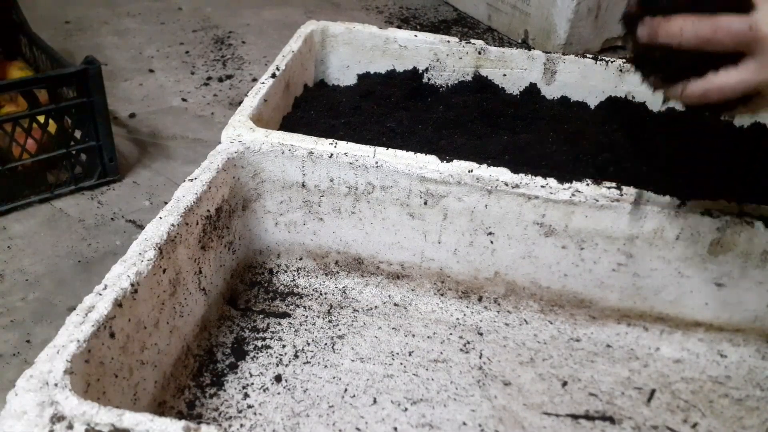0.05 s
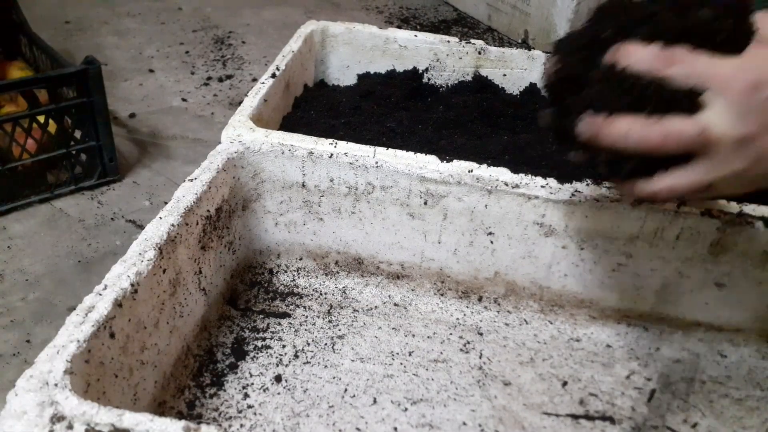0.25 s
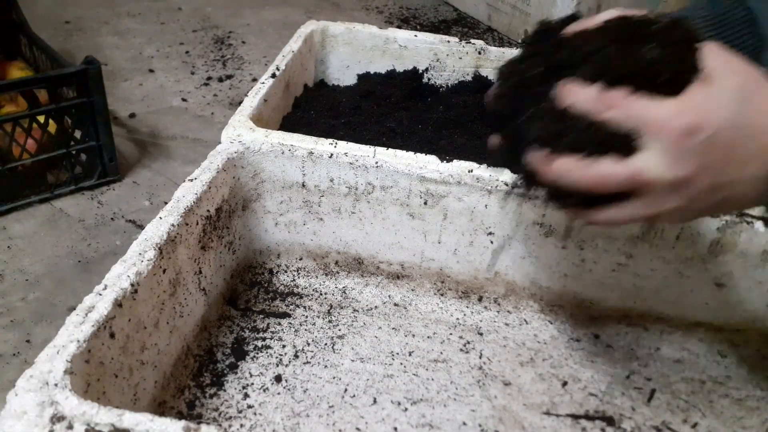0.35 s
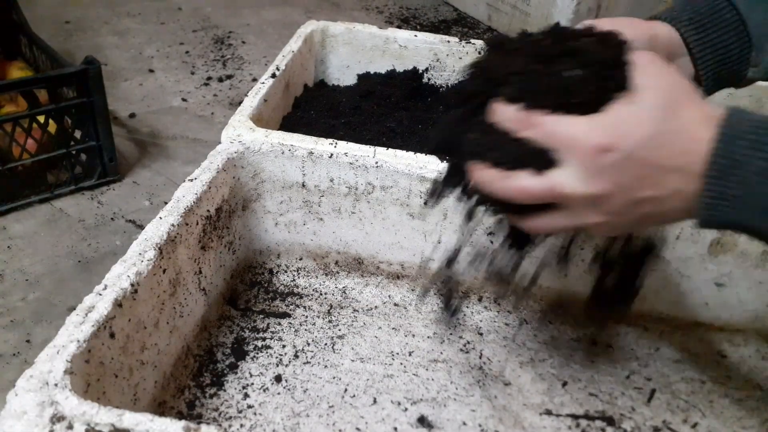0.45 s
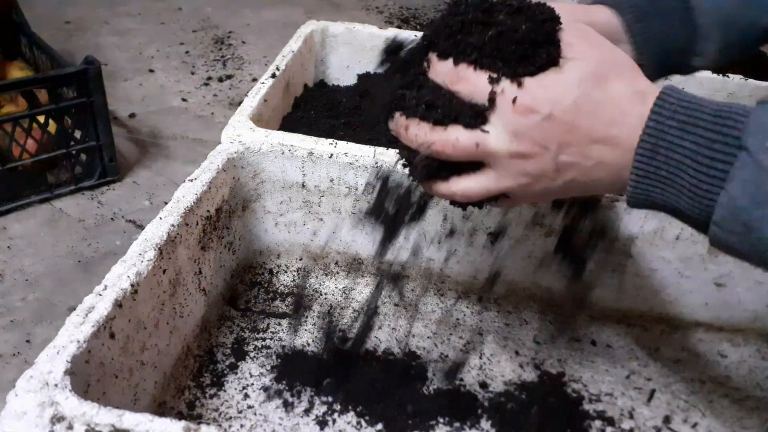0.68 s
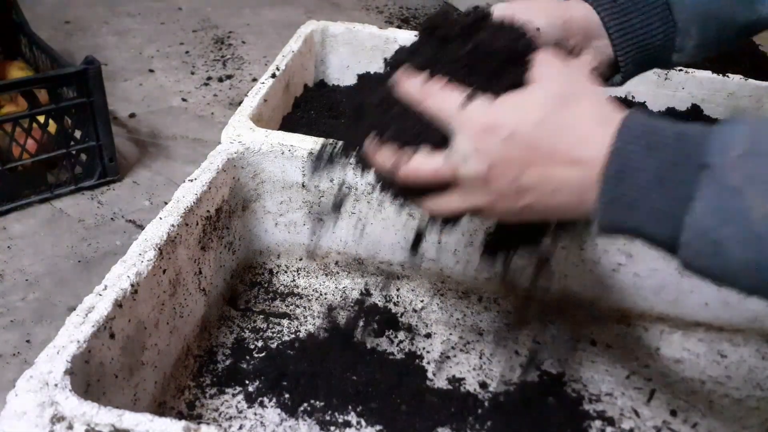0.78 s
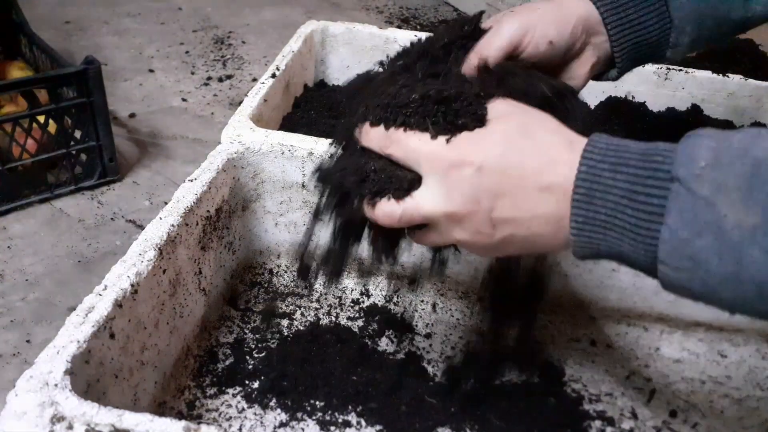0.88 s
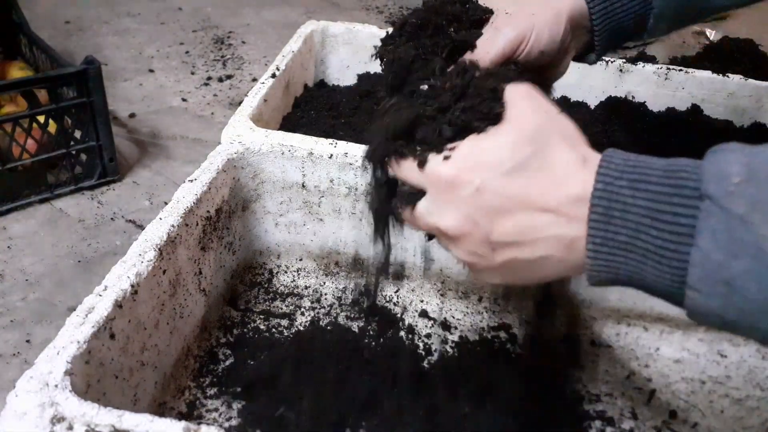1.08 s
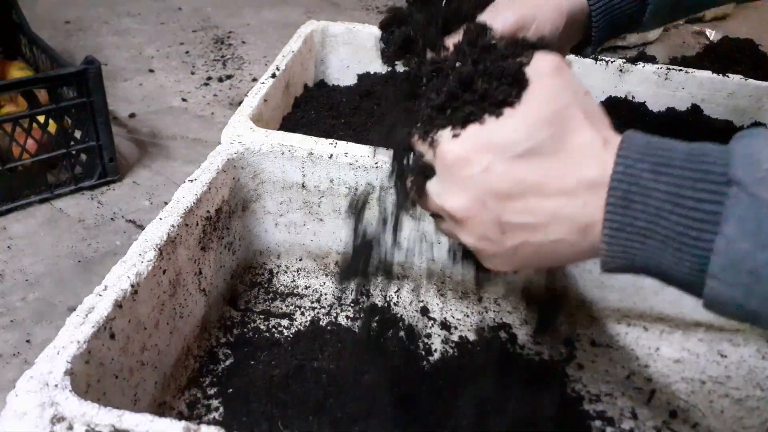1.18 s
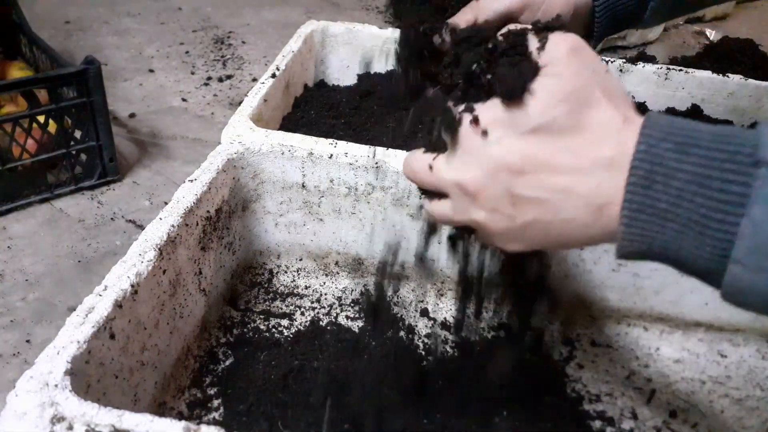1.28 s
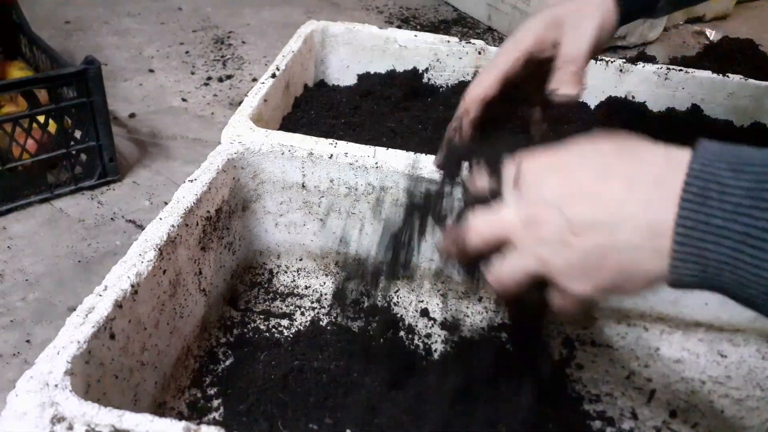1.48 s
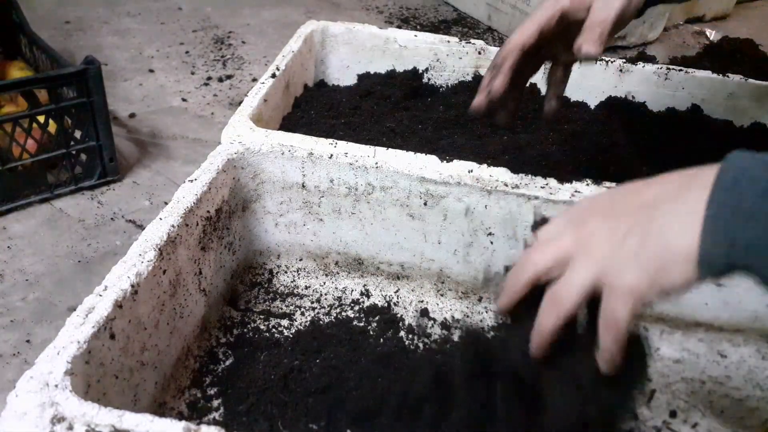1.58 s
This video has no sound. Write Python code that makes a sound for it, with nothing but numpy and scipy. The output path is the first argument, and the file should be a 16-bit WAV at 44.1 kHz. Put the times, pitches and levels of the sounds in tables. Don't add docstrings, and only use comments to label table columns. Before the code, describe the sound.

Crackly rustle of damp potting fibre dropped by hand into a hollow foam tray indoors

```python
import sys
import numpy as np
from scipy import signal
from scipy.fft import rfft, irfft, next_fast_len
from scipy.io import wavfile
from scipy.ndimage import map_coordinates

SR = 44100
rng = np.random.default_rng(int(sys.argv[2]) if len(sys.argv) > 2 else 0)


def persist_wave(psi):
    counts = np.round(np.clip(psi, -1, 1) * 32767).astype(np.int16)
    wavfile.write(sys.argv[1], SR, np.atleast_2d(counts).T)


def amplitude_ratio(level_db):
    exponent = np.asarray(level_db, float) / 20
    return 10 ** exponent


N = 72765


def unit(x):
    return x / np.sqrt(np.mean(x ** 2) + 1e-20)


def along(points, hz):
    f, value = np.transpose(points)
    return np.interp(np.log(hz + 1), np.log(f + 1), value)


def wobble(rate):
    knots = rng.standard_normal(int(N * rate / SR) + 4)
    return map_coordinates(knots, [np.arange(N) * rate / SR])


def filtered(x, response):
    m = next_fast_len(N + SR // 2)
    hz = np.fft.rfftfreq(m, 1 / SR)
    return irfft(rfft(x, m) * response(hz), m)[..., :N]


def add(track, s, sound):
    part = track[..., max(round(s * SR), 0):][..., :sound.shape[-1]]
    part += sound[..., :part.shape[-1]]


# start in seconds [s], peak level [dB], knock pitch [Hz].
CLUMPS = [(0.0498, -45, 1550), (0.1087, -40.5, 1690), (0.1734, -58, 1840), (0.2223, -26, 787),
          (0.2308, -32.5, 907), (0.3083, -28, 800), (0.3159, -25.5, 835), (0.3204, -30, 706),
          (0.343, -26.5, 1980), (0.3527, -26, 900), (0.3635, -23.5, 1076), (0.3822, -29, 1078),
          (0.4094, -30, 910), (0.4246, -38.5, 790), (0.4332, -47, 1800), (0.4688, -25.5, 1890),
          (0.4731, -31, 1360), (0.5019, -23.5, 1090), (0.5105, -34.5, 1070), (0.5207, -31, 1077),
          (0.5342, -29.5, 1600), (0.5454, -26, 1540), (0.5501, -22.5, 1162), (0.5734, -18.5, 890),
          (0.5815, -11, 731), (0.5861, -18.5, 860), (0.5919, -13, 971), (0.5968, -22, 963),
          (0.6052, -14, 809), (0.6159, -13, 984), (0.6336, -24, 935), (0.6585, -18, 776),
          (0.6619, -19, 740), (0.6833, -22, 766), (0.6885, -29, 1154), (0.6944, -22.5, 825),
          (0.7036, -26.5, 766), (0.7188, -34.5, 1190), (0.7275, -27.5, 1220), (0.7452, -15, 1243),
          (0.7496, -15, 1403), (0.756, -12, 1093), (0.7597, -14, 998), (0.7733, -33.5, 900),
          (0.7912, -23, 1130), (0.8084, -30.5, 920), (0.8126, -33, 763), (0.8175, -38.5, 850),
          (0.8491, -15, 975), (0.8531, -19, 674), (0.8584, -25.5, 682), (0.8673, -35.5, 717),
               (0.8786, -25, 1205), (0.899, -18, 1026), (0.9035, -24, 920), (0.9117, -24.5, 1153),
               (0.951, -19, 752), (0.9594, -23, 1434), (0.965, -27, 975), (0.9733, -39, 1010),
               (0.9856, -36, 1215), (1.0429, -42, 1110), (1.055, -21, 1067), (1.0636, -20.5, 1167),
               (1.068, -28, 1066), (1.0715, -20.5, 1286), (1.0936, -33, 1150), (1.1015, -23, 1095),
               (1.1064, -19, 1422), (1.1151, -28.5, 1390), (1.1263, -27.5, 1130), (1.1358, -19.5, 1356),
               (1.1473, -23, 834), (1.1595, -16, 1067), (1.1635, -23, 932), (1.1732, -28, 970),
               (1.2006, -30.5, 1000), (1.2239, -25.5, 1324), (1.2305, -22, 1287), (1.2397, -25, 1365),
               (1.2531, -37.5, 1370), (1.2804, -19, 1126), (1.2864, -21.5, 1415), (1.2954, -25, 980),
               (1.3087, -21, 954), (1.3125, -28, 952), (1.3249, -22.5, 1054), (1.3454, -19.5, 1254),
               (1.3611, -31.5, 1247), (1.4332, -33.5, 1210), (1.4543, -43, 1350), (1.5091, -39.5, 1257),
               (1.5669, -33, 1180), (1.5716, -45, 1050), (1.5757, -39, 886), (1.6213, -45.5, 1028)]
# start in seconds [s], peak level [dB], knock
# pitch [Hz].
MORE_KNOCKS = [
    (0.2185, -23.5, 1100),
    (0.025, -46, 813),
    (1.9, -32, 1250),
    (1.399, -39, 2170),
    (0.865, -22.5, 3170),
    (1.511, -36, 2160),
    (2.1, -29, 3500),
    (0.67, -24, 3150),
]


def clumps():
    knock_cycles, knock_db = 0.763, -0.5
    sag = 0.04
    tick_hz, tick_s, tick_db = 1997, 0.00132, -3.5
    bits_per_s, break_db, break_t60, lead_s = 3000, -17, 0.0417, 0.003
    knocks, debris = np.zeros((2, N)), np.zeros((2, N))
    t = np.arange(SR // 5) / SR
    before_db = -12 * (1 - t / lead_s) - 9
    after_db = -60 * (t - lead_s) / break_t60
    shed_db = np.where(t < lead_s, before_db, after_db)
    for s, db, hz in CLUMPS + MORE_KNOCKS:
        start = np.array([[0], [rng.uniform(0, 2 * np.pi)]])
        bits = rng.standard_normal((2, len(t)))
        landing = rng.random(len(t)) < bits_per_s / SR
        cycles = t * hz
        u = cycles / knock_cycles
        phase = 2 * np.pi * np.log(1 + sag * cycles) / sag
        knock = u * np.exp(1 - u) * np.sin(phase + start)
        skin_hz = tick_hz * (1 + 0.078 * bits[0, 0])
        tick_swell = t / tick_s * np.exp(1 - 2 * t / tick_s)
        tick = amplitude_ratio(tick_db) * tick_swell * np.sin(2 * np.pi * skin_hz * t + start)
        add(knocks, s, amplitude_ratio(db + knock_db) * (knock + tick))
        shed = bits * landing * np.sqrt(SR / bits_per_s)
        add(debris, s - lead_s, amplitude_ratio(db + break_db + shed_db) * shed)
    return spread(*(knocks + filtered(debris, foam(0, -5.5))))


# start in seconds [s], peak level [dB].
FLOOR_THUDS = [(0.077, -82.5), (0.313, -50.5), (.43, -57), (0.601, -43), (0.728, -33.5), (0.778, -38.5),
               (0.95, -37), (0.979, -31.5), (1.099, -37.5), (1.15, -41.5), (1.203, -52), (1.3, -47),
               (1.362, -37.5), (1.472, -49), (1.563, -44)]
# start in seconds [s], deep panel [dB], upper panel [dB].
PANEL_BOOMS = [(0.088, -61.5, -44), (0.228, -35, -29.5), (0.316, -35.5, -27.5), (0.353, -40.5, -26.5),
               (0.42, -36, -34), (.46, -41.5, -51), (0.506, -47, -44), (.555, -33.5, -43.5),
               (0.578, -22.5, -23), (.598, -24, -17), (0.615, -19.5, -25), (0.658, -23.5, -36.5),
               (0.709, -29, -24), (0.754, -21.5, -16.5), (0.78, -24.5, -26.5), (.82, -34, -36.5),
               (0.852, -24, -16), (.868, -26, -45), (0.899, -36.5, -26), (0.954, -23, -34),
               (.964, -24, -35.5), (1.07, -31, -48.5), (1.099, -25.5, -46), (1.137, -23.5, -32.5),
               (1.2, -32, -37.5), (1.31, -30, -30), (1.35, -33, -38), (1.44, -49, -42.5),
               (1.55, -44.5, -44.5), (1.619, -43, -44.5)]
# start in seconds [s], peak level [dB].
SOFT_PUSHES = [
    (0.229, -42),
    (0.317, -31.5),
    (0.347, -41),
    (0.594, -34),
    (0.749, -43.5),
    (0.953, -29),
    (1.096, -31.5),
    (1.201, -31.5),
    (1.566, -41.5),
]
# start in seconds [s], peak level [dB], pitch [Hz].
SIDE_WALL_RING = [
    (.226, -42.5, 753),
]


def thuds():
    boom_db, boom_rise_s = 0.5, 0.002054
    # start s, level dB, pitch Hz, t60 s, rise s
    falls = [(s, db + 7.5, 114.95, 0.2866, 0.00595) for s, db in FLOOR_THUDS]
    falls += [(s, db + boom_db, hz, 0.367, boom_rise_s) for s, db, hz in SIDE_WALL_RING]
    falls += [(s, db + boom_db, 298.73, 0.1482, boom_rise_s) for s, db, _ in PANEL_BOOMS]
    falls += [(s, db + boom_db, 354.65, 0.08, boom_rise_s) for s, _, db in PANEL_BOOMS]
    falls += [(s, db + 6.5, 189.2, 0.0562, boom_rise_s) for s, db in SOFT_PUSHES]
    out, t = np.zeros(N), np.arange(SR // 3) / SR
    for s, db, hz, t60, rise_s in falls:
        detune = 0.012 * rng.standard_normal()
        drift = 0.0162 * wobble(31.7)[:len(t)]
        turns = np.cumsum(hz * (1 + detune + drift)) / SR
        level_db = db - 60 * t / t60 + 2.32 * wobble(59.7)[:len(t)]
        add(out, s, amplitude_ratio(level_db) * (1 - np.exp(-t / rise_s)) * np.sin(2 * np.pi * turns))
    return out


# time in seconds [s], crumb fall [dB], fibre dust [dB].
SHOWER_LEVELS = [(0, -83.5, -81), (0.062, -53, -67), (.15, -75, -78.5), (.2, -61.5, -63.5), (.3, -49, -68),
                 (.33, -40, -56), (0.539, -55.5, -62), (0.572, -30, -45.5), (.79, -32.5, -47.5),
                 (0.829, -39.5, -51), (1.031, -45, -57.5), (1.07, -41.5, -49), (1.159, -36.5, -49),
                 (1.2, -47.5, -63), (1.27, -47.5, -62), (1.379, -41, -54.5), (1.47, -56.5, -67),
                 (1.65, -49, -59.5)]


def crumbs():
    crumbs_per_s, spread_db, biggest = 2000, 4, 0.04
    s, fall_db, _ = np.transpose(SHOWER_LEVELS)
    when, rarity, _, side = rng.random((round(crumbs_per_s * N / SR), 4)).T
    size = amplitude_ratio(-spread_db * np.log(rarity + biggest))
    at = (when * N).astype(int)
    taps = np.array([np.bincount(at, size, N), np.bincount(at, size * np.sign(side - 0.5), N)])
    taps = taps / np.linalg.norm(size) * np.sqrt(N)
    level_db = np.interp(np.arange(N) / SR, s, fall_db) + wobble(40.62)
    return spread(*filtered(taps * amplitude_ratio(level_db), foam(-8, -4)))


# start in seconds [s], peak level [dB].
FIBRE_TEARS = [(0.0546, -41.5), (0.17, -46), (0.2228, -35.5), (0.308, -34.5), (0.3415, -29.5),
               (0.409, -46.5), (0.4192, -34.5), (0.5703, -24.5), (0.6339, -45.5), (0.6644, -40.5),
               (0.6893, -23), (0.7158, -29.5), (0.7405, -25), (0.7617, -24.5), (0.9445, -26.5),
               (.956, -27.5), (1.0645, -30), (1.1044, -34), (1.1364, -30), (1.1983, -40.5), (1.279, -34),
               (1.3064, -33), (1.3545, -33.5), (1.3784, -40), (1.4314, -36), (1.5638, -35.5),
               (1.6018, -54.5), (1.6202, -39.5)]
# start in seconds [s], peak level [dB].
FIBRE_SNAPS = [(.0105, -57), (0.0165, -50), (0.0226, -48), (0.0947, -44.5), (0.107, -45.5), (0.196, -45),
               (.3135, -30.5), (0.3324, -41.5), (.364, -35), (.432, -39), (0.5006, -32.5), (0.5435, -32),
               (0.6557, -28.5), (.718, -24.5), (.761, -28), (0.7994, -46.5), (1.1224, -28.5), (1.238, -39),
               (1.325, -32.5), (1.539, -41)]
# frequency [Hz], level per hertz [dB].
HISS_COLOUR = [(880, -14), (1500, -2), (2740, -7.5), (3840, -11), (12700, -18.5), (16000, -22)]


def fibres():
    dust_db, tear_db, tear_rise, sputter_db = 4.5, -7, 0.2837, 1.8
    s, _, level_db = np.transpose(SHOWER_LEVELS)
    t = np.arange(N) / SR
    power = amplitude_ratio(dust_db + np.interp(t, s, level_db) + wobble(69.08)) ** 2
    for table, length_s in ((FIBRE_TEARS, 0.01118), (FIBRE_SNAPS, 0.0051)):
        for at, db in table:
            u = np.clip((t - at) / length_s, 0, None)
            envelope = (1 - np.exp(-u / tear_rise)) * np.exp(-u ** 2)
            power = power + (amplitude_ratio(db + tear_db) * envelope) ** 2
    colour = [(700, -55.5)] + HISS_COLOUR
    hiss = unit(filtered(rng.standard_normal((2, N)), lambda f: amplitude_ratio(along(colour, f))))
    return 1.783 * np.sqrt(power) * amplitude_ratio(sputter_db * wobble(400)) * hiss


def resonance(f, hz, width):
    return 1j * f * width / (hz * hz - f * f + 1j * f * width)


# pitch [Hz], width [Hz], level [dB].
WALL_MODES = [(595.9, 86.6, 1.5), (746.3, 29.4, 7), (800, 26.5, 6.5), (988.6, 49.7, 4), (1182.4, 127.6, 3),
              (1355.6, 116, 1.5), (1491, 102.5, -0.5), (2023, 211, 1), (3510, 2370, -9)]


def walls(f):
    return sum((-1) ** k * amplitude_ratio(db) * resonance(f, hz, width)
               for k, (hz, width, db) in enumerate(WALL_MODES))


# pitch [Hz], level [dB], decay t60 in seconds [s].
PANEL_MODES = [(177.2, -7.5, 0.078), (211.2, -2.5, 0.046), (293.16, 7.5, 0.1354), (345.4, 2, 0.0436),
               (432.7, -11, 0.029)]


def panels(f):
    return sum(amplitude_ratio(db) * resonance(f, hz, np.log(1000) / np.pi / t60) for hz, db, t60 in PANEL_MODES)


def foam(wall_db, panel_db):
    contact_s = 0.0001423

    def response(f):
        soft = (1j * f / (90 + 1j * f)) / (1 + 2j * np.pi * f * contact_s / 3) ** 2
        return (8 * amplitude_ratio(wall_db) * walls(f) + 12 * amplitude_ratio(panel_db) * panels(f)) * soft
    return response


# frequency [Hz], t60 in seconds [s].
ROOM_DECAY = [(200, 0.208), (2000, 0.1496), (10000, 0.299)]


def room(x):
    hz, t, z = signal.stft(rng.standard_normal((2, SR // 2)), SR, nperseg=256)
    decay = amplitude_ratio(-60 * t / along(ROOM_DECAY, hz)[:, None])
    tail = signal.istft(z * decay, SR, nperseg=256)[1]
    tail = tail / np.linalg.norm(tail[0])
    late = np.pad(x, (300, 0))[None]
    return signal.fftconvolve(late, tail, axes=1)[:, :N]


# frequency [Hz], level per hertz [dB].
AIR_COLOUR = [(18, -46), (30, -35.5), (303, -42), (569, 13), (1320, -14), (16000, -5)]


def still_air():
    return unit(filtered(rng.standard_normal((2, N)), lambda f: amplitude_ratio(along(AIR_COLOUR, f))))


# frequency [Hz], left-right likeness [0 to 1].
LIKENESS = [(100, 0.85), (400, 0.836), (1400, 0.552), (3100, 0.26), (7000, 0)]


def spread(near, other):
    def mid_side(f):
        turn = np.arccos(np.clip(along(LIKENESS, f), -1, 1)) / 2
        return np.array([np.cos(turn), np.sin(turn)])
    mid, side = filtered(np.array([near, other]), mid_side)
    return np.array([mid + side, mid - side])


def scene():
    box = clumps() + thuds() + crumbs() + fibres()
    air = spread(*still_air())
    echoes = spread(*room(box.mean(0)))
    return box + amplitude_ratio(-9) * echoes + amplitude_ratio(-71) * air


def band_limit(x):
    return signal.sosfilt(signal.butter(12, 16620, fs=SR, output="sos"), x)


# frequency [Hz], left minus right [dB].
PORT_LEAN = [(100, -3), (1000, -3), (6000, -2), (14000, 2.5)]


def record(dry):
    def microphones(f):
        ports = amplitude_ratio(along(PORT_LEAN, f) * np.array([[0.5], [-0.5]]))
        bass_cut = (1j * f / (75 + 1j * f)) ** 2
        return ports * bass_cut * (f < 15950)
    mix = filtered(dry, microphones)
    return band_limit(mix)


dry = scene()
out = record(dry)
persist_wave(out)
```